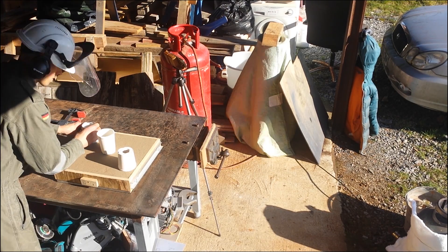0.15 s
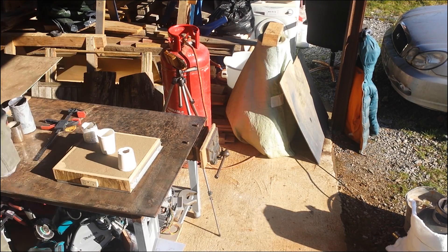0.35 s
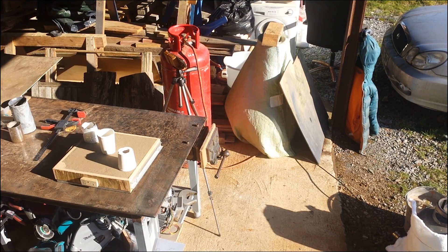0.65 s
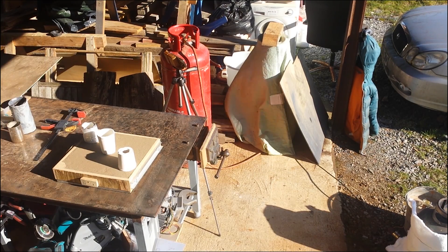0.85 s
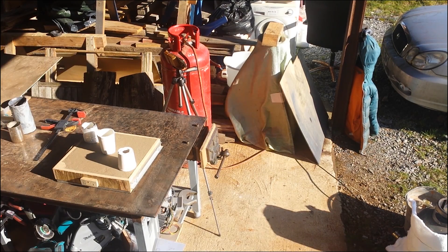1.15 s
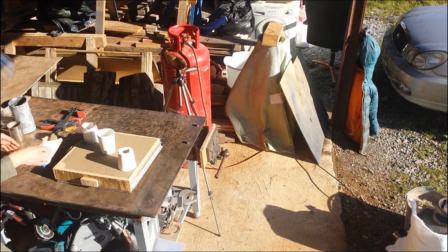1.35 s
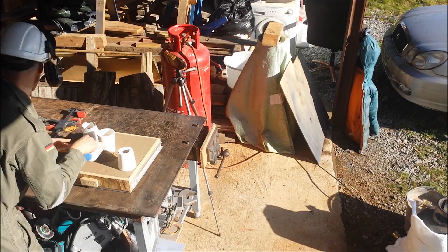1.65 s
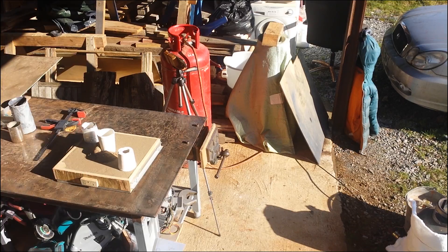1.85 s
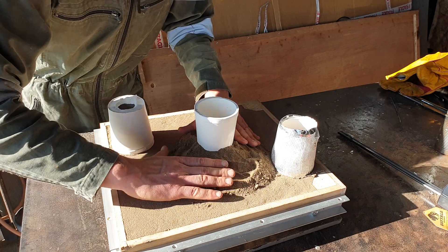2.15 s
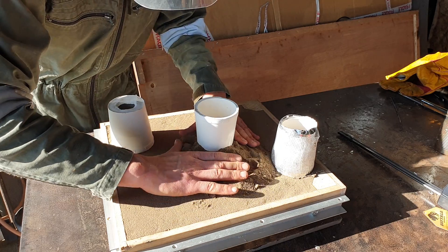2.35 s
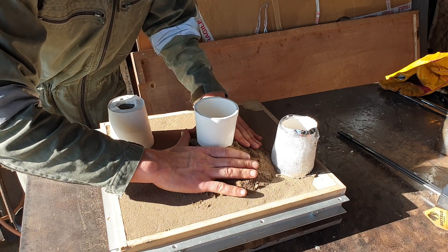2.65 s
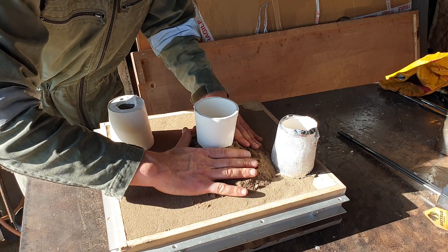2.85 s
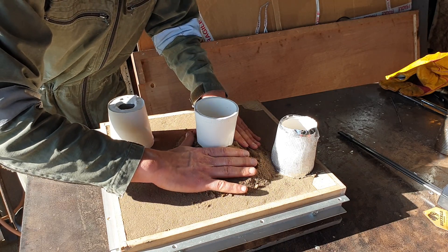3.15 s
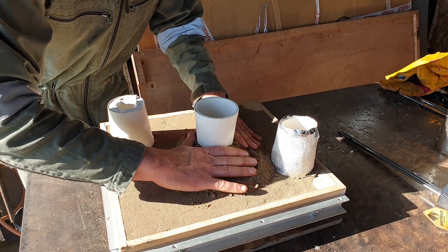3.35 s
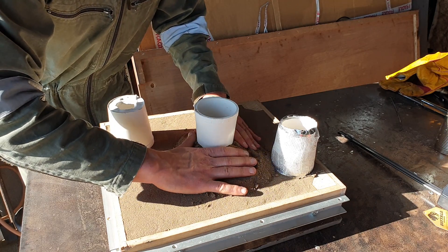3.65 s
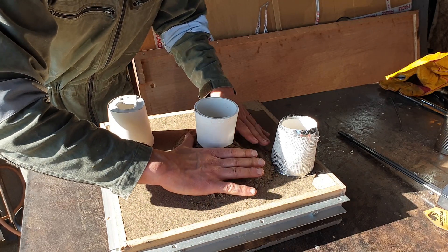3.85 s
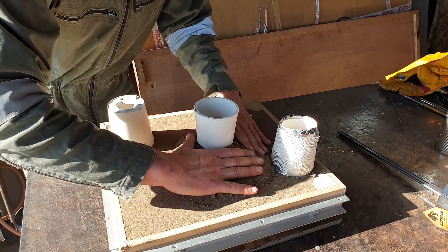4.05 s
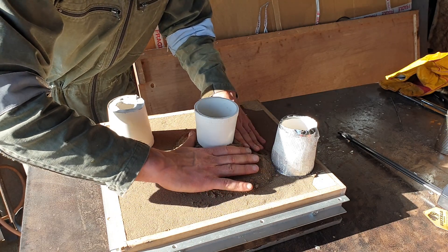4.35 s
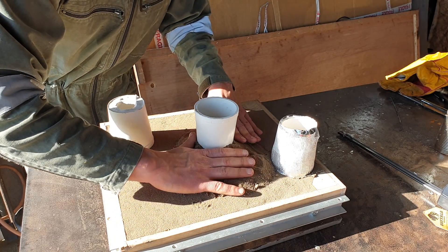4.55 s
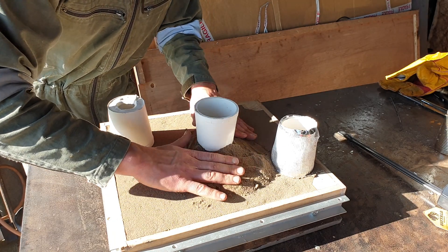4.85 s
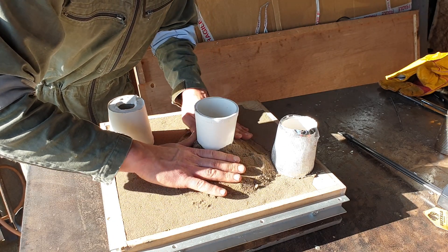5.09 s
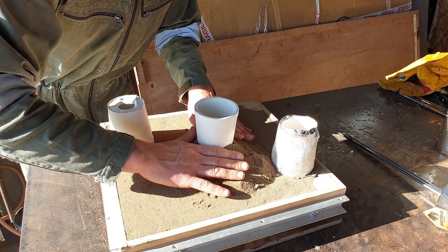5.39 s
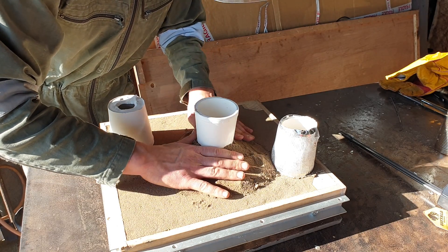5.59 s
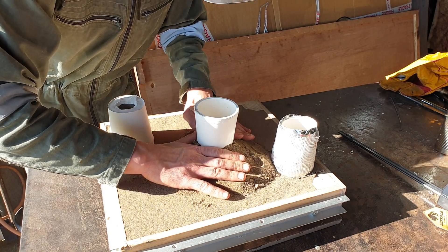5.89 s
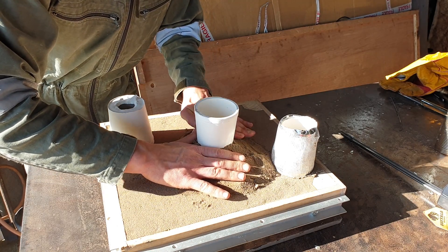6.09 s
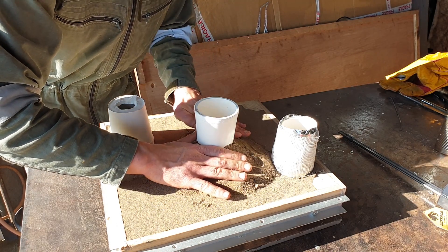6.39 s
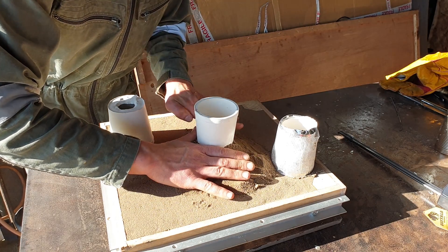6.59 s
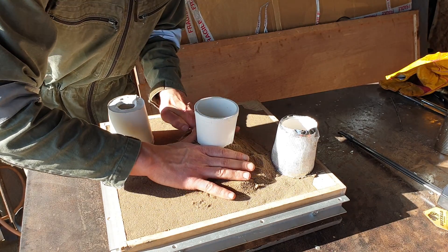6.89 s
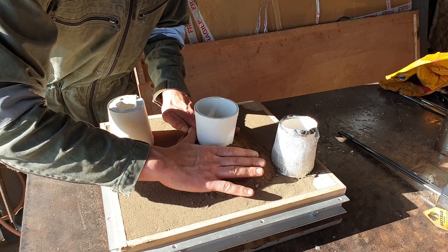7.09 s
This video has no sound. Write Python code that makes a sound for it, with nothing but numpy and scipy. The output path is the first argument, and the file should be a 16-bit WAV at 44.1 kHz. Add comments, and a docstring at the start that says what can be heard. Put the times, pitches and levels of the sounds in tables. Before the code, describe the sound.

A faint hollow drone with light scuffs and thumps at a workbench cuts abruptly to a close, steady gas burner roar with wavering hiss.

```python
"""A gas burner fires into a small furnace in a backyard workshop while a sand mould is packed by hand.
At first resonances and a repeating delay make filtered noise a faint, hollow, humming drone, with a thin
sputtering hiss on the right; gritty noise bursts and dull damped sines are light scuffs and thumps at the bench.
Then, all at once, chamber-coloured noise roars close and steady, with a tube's rush and airy note,
and a gas hiss, made of wavering noise bands, holds level and then swells and sinks on the left."""
import sys
import numpy as np
from scipy import signal
from scipy.fft import rfft, irfft, next_fast_len
from scipy.io import wavfile
from scipy.ndimage import uniform_filter1d

SR = 44100
rng = np.random.default_rng(int(sys.argv[2]) if len(sys.argv) > 2 else 0)


def file_out(sig):
    """Save sig as 16-bit WAV at sys.argv[1]."""
    # one column per channel
    cols = np.atleast_2d(sig).T
    # limit, then scale
    lim = np.clip(cols, -1, 1)
    pcm = np.round(lim * 32767).astype(np.int16)
    wavfile.write(sys.argv[1], SR, pcm)


N = 318843

# Spectra of the faint drone, its thin hiss and the sizzle on top: (frequency [Hz], relative density [dB per Hz])
DRONE_SPECTRUM = [(15, -3), (50, -10), (90, -4), (175, -2), (310, -4), (420, -11), (600, -18), (820, -23),
                  (1020, -36), (1330, -40.5), (1700, -35), (2150, -36.5), (2600, -45.5), (5000, -50.5),
                  (16000, -53)]
THIN_HISS_SPECTRUM = [(1000, -32), (2000, -19.5), (2600, -17), (4000, -16.5), (5600, -16.5), (6500, -7),
                      (7250, 1.5), (7700, -5.5), (8300, -12), (10000, -34), (16000, -36)]
SIZZLE_SPECTRUM = [(6000, -27), (7800, -8), (9400, 0), (10100, -4.5), (11100, -15), (12100, -10.5),
                   (13600, -18), (16000, -21)]
# Resonances that hum in the faint drone: (frequency [Hz], width [Hz], lift [dB])
DRONE_RESONANCES = [(92, 16, 2), (161, 7.2, 4), (183, 9.6, 2), (229, 15, 4), (307, 9, 2), (1546, 180, 8.5)]
# Nearly steady tones in the faint drone: (frequency [Hz], mean level [dB])
HUM_TONES = [(164, -48), (187, -50)]
# Soft thumps on the bench: (time [s], level before the soft onset [dB], pitch [Hz], decay by 60 dB [s])
THUMPS = [(.482, -24, 70, .045), (0.538, -25, 130, 0.047)]
# Hands scuffing on the mould: (time [s], level before onset and grit [dB], fade length [s])
SCUFFS = [(0.48, -51, .012), (0.509, -49.5, 0.011), (0.529, -53, 0.011), (0.547, -55, .01),
          (0.763, -54, 0.0073), (0.789, -57.5, 0.023), (1.093, -52, 0.013), (1.119, -57, .01),
          (1.772, -49.5, 0.011), (1.796, -50, 0.015), (1.821, -54.5, 0.013)]
# Spectrum of a scuff: (frequency [Hz], relative density [dB per Hz])
SCUFF_SPECTRUM = [(300, 5.5), (900, 7), (2000, -2.5), (4000, -1.5), (7000, -3), (10000, -13), (16000, -17)]
# Spectra of the combustion roar and the deep rumble under it: (frequency [Hz], relative density [dB per Hz])
ROAR_SPECTRUM = [(60, -30), (90, -9.5), (115, -2.5), (160, -3.5), (250, -11), (310, -13.5), (420, -17.5),
                 (520, -22.5), (700, -29), (860, -31), (1000, -42.5), (1300, -48.5), (3000, -57)]
RUMBLE_SPECTRUM = [(12, -20), (20, -33), (35, -17.5), (55, 0), (85, 2), (105, 3), (140, -27), (300, -52.5)]
# Resonances and dips of the furnace chamber: (frequency [Hz], width [Hz], lift [dB])
CHAMBER_RESONANCES = [(134.4, 4.2, 4.5), (176, 22.6, 5.5), (191.6, 6.6, -7.5), (219.4, 49, 4),
                      (277.6, 9.5, 7), (323.6, 10.4, 7), (351, 10, -6.5), (372.4, 8.8, 6), (414, 12.4, 5.5),
                      (450, 12, 5), (620, 6.9, 4.5), (735.3, 11, 9)]
# Spectrum of the turbulent rush in the burner tube: (frequency [Hz], relative density [dB per Hz])
RUSH_SPECTRUM = [(500, 4.5), (900, 2.5), (1250, -4), (1800, 2.5), (2500, -3.5), (3200, -7), (4200, -3),
                 (6200, -11), (7500, -8), (8800, -17), (10000, -22), (11600, -8), (13500, -46),
                 (16000, -37)]
# Resonances of the burner tube: (frequency [Hz], width [Hz], lift [dB])
TUBE_RESONANCES = [(1546, 120, 13), (1750, 67, 3), (2186, 140, 5), (2804, 140, 6), (3610, 460, 5),
                   (5500, 340, 6)]
# Spectrum of the gas jet's hiss: (frequency [Hz], relative density [dB per Hz])
JET_SPECTRUM = [(2500, -36), (5000, -21), (6300, -10), (6850, -5), (7150, 0.5), (7550, 2), (7900, -4.5),
                (8300, -9), (9300, -9), (10300, -4.5), (12100, -4), (13000, -2.5), (13500, -5.5),
                (16000, -11)]
# Correlation of roar and rush at the two ears, clipped to -1..1 in use: (frequency [Hz], likeness [ratio])
EAR_LIKENESS = [(40, 4), (130, 1.05), (300, 0.85), (550, 0), (800, 1.7), (1150, 0.5), (1600, 0.89),
                (3000, 0.5), (6000, 0.62), (15000, -2)]
# Excess of the left ear over the right for roar and rush: (frequency [Hz], level difference [dB])
LEFT_EXCESS = [(60, 1), (130, 2.5), (210, 1.5), (400, 3), (800, 3.5), (1500, 2.5), (2700, .5), (15000, 1)]
# Brief flares of the flame: (time [s], lift [dB])
FLARES = [(2.46, 2), (2.77, 4), (4.06, 3.5)]
# Deep rumble under the roar: (time [s], level [dB])
RUMBLE_LEVEL = [(2.15, -34), (2.3, -33), (2.45, -36.5), (2.7, -31), (3.3, -35), (3.8, -31), (4.2, -35),
                (4.9, -31), (5.3, -34), (7.22, -32.5)]
# Rush of air and gas through the tube, before its flicker: (time [s], level [dB])
RUSH_LEVEL = [(2.2, -48), (2.55, -49.5), (2.95, -51), (3.15, -50), (4.1, -50.5), (4.55, -52), (5.0, -53),
              (5.24, -50.3), (5.5, -52), (6.05, -50.5), (6.6, -49.5), (7.22, -50)]
# Gas jet, before its flicker; steady, then swelling and sinking: (time [s], level [dB])
JET_LEVEL = [(2.15, -51.7), (3.87, -52), (3.97, -46.5), (4.13, -55), (4.43, -58.5), (4.52, -51.5),
             (4.62, -60), (4.85, -58), (5.12, -50.5), (5.32, -52), (5.48, -57), (5.62, -53), (5.87, -58.5),
             (6.11, -48), (6.2, -52), (6.35, -52), (6.57, -56.5), (6.8, -50), (7.22, -51.5)]

CLOSE_FROM_S = 2.1412  # middle of the change from faint to close
RIGHT_LAG_S, WALL_ECHO_S, FLUTTER_S = .00034, .0297, .04269
CUTOFF_HZ = 15750
DRONE_DB, THIN_HISS_DB, SIZZLE_DB = -40.5, -58.5, -64  # before flicker and sputter
HUM_WIDTH_HZ = 2.0  # offset at which the gain has halved
SINGING_HZ, SINGING_WIDTH_HZ = 789, 13  # width: offset at which the gain has halved
SINGING_DB, SINGING_FOLLOWS = -53, 0.97  # level at mean rush; share of the rush's swing in dB
ROAR_DB, ROAR_SAG_DB_PER_S = -25.5, 0.16  # level at CLOSE_FROM_S, before flares and flicker
FLARE_S = 0.021  # standard deviation of a flare's bell shape

TIME = np.arange(N) / SR
SIZE = next_fast_len(N, True)
HZ = np.maximum(np.fft.rfftfreq(SIZE, 1 / SR), 1)


def from_db(db):
    """An amplitude ratio grows tenfold for every 20 dB."""
    return 10 ** (np.asarray(db) / 20)


def rms_one(x):
    """Normalise power: the mean of the channels gets rms 1."""
    return x / np.sqrt(np.mean(np.atleast_2d(x).mean(axis=0) ** 2) + 1e-20)


def by_time(points):
    """Interpolate a level linearly over time."""
    seconds, level = np.transpose(points)
    return np.interp(TIME, seconds, level)


def by_hz(points):
    """Interpolate a value over the logarithm of frequency."""
    hz, value = np.transpose(points)
    return np.interp(np.log(HZ), np.log(hz), value)


def colour(spectrum, resonances=()):
    """Resonances add humps or dips, in dB, to a broad source spectrum."""
    gain_db = by_hz(spectrum)
    for hz, width, lift_db in resonances:
        gain_db = gain_db + lift_db / (1 + (2 * (HZ - hz) / width) ** 2)
    return from_db(gain_db)


def delay(seconds):
    """A pure delay turns phase in proportion to frequency."""
    return np.exp(-2j * np.pi * HZ * seconds)


def drift(rate_hz):
    """Low-passed white noise gives a slow random fluctuation of rms 1."""
    spectrum = rfft(rng.standard_normal(SIZE)) / (1 + (HZ / rate_hz) ** 2)
    return rms_one(irfft(spectrum, SIZE)[:N])


def pan(left_db):
    """A level difference between the ears, split evenly, shifts a source sideways."""
    return from_db(np.array([[.5], [-.5]]) * left_db)


def stereo_noise(gain, likeness, left_db):
    """Common and opposed noise set the correlation of the ears; the right ear lags."""
    mid, side = rfft(rng.standard_normal((2, SIZE)))
    alike = np.clip(likeness, -1, 1)
    common = np.sqrt(1 + alike) * mid
    opposed = np.sqrt(1 - alike) * side * [[1], [-1]]
    ears = (common + opposed) * gain * pan(left_db)
    ears[1] *= delay(RIGHT_LAG_S)
    return rms_one(irfft(ears, SIZE)[:, :N])


def steady(x, span_s):
    """Division by the running rms removes slow swells and keeps fast fluctuation."""
    size = max(int(span_s * SR), 2)
    power = uniform_filter1d(x.mean(axis=0) ** 2, size)
    return x / np.sqrt(uniform_filter1d(power, size) + 1e-12)


def moving_reflection(x, lag_s, sway, reflect):
    """A reflection of drifting delay interferes, so ripples wander through the spectrum."""
    at = np.arange(N)
    ears = []
    for ear in x:
        lag = SR * lag_s * (1 + sway * drift(0.24))
        ears.append(ear + reflect * np.interp(at - lag, at, ear))
    return np.array(ears)


def faint_furnace(drone_repeat=0.53, hiss_repeat=0.28, flicker_db=1.0, sputter_rate=14,
                  hiss_sputter_db=.7, sizzle_sputter_db=1.9):
    """Delayed feedback combs a wide drone hollow; hiss and sizzle on the right share one fluctuation."""
    hollow = 1 / (1 - drone_repeat * delay(FLUTTER_S))
    flutter = 1 / (1 - hiss_repeat * delay(FLUTTER_S))
    sputter = drift(sputter_rate)
    drone = stereo_noise(colour(DRONE_SPECTRUM, DRONE_RESONANCES) * hollow, likeness=0.062, left_db=-2.1)
    drone = steady(drone, span_s=0.14) * from_db(DRONE_DB)
    hiss = stereo_noise(colour(THIN_HISS_SPECTRUM) * flutter, likeness=0, left_db=-37.0)
    hiss = hiss * from_db(THIN_HISS_DB + hiss_sputter_db * sputter)
    sizzle = stereo_noise(colour(SIZZLE_SPECTRUM) * flutter, likeness=0, left_db=-31.0)
    sizzle = sizzle * from_db(SIZZLE_DB + sizzle_sputter_db * sputter)
    return drone + (hiss + sizzle) * from_db(flicker_db * drift(32))


def faint_hum(waver_db=1.0):
    """Narrow resonances select nearly steady tones from noise."""
    hum = 0
    for hz, db in HUM_TONES:
        resonance = 1 / (1 + ((HZ - hz) / HUM_WIDTH_HZ) ** 2)
        tone = stereo_noise(resonance, likeness=0.47, left_db=-2.0)
        hum += steady(tone, span_s=0.27) * from_db(db + waver_db * drift(3.2))
    return hum


def thumps(rise_s=0.0022):
    """A hand's impulse sets the bench into a few damped, dull oscillations."""
    out = np.zeros(N)
    for s, db, hz, t60 in THUMPS:
        age = np.maximum(TIME - s, 0)
        decay = from_db(db - 60 * np.minimum(age / t60, 2))
        onset = 1 - np.exp(-age / rise_s)
        out += decay * onset * np.sin(2 * np.pi * hz * age)
    return out * pan(-2.5)


def scuffs(attack_s=0.0043, grit_db=3.5):
    """Friction of sand and card excites short noise bursts, roughened by rapid level fluctuation."""
    touch = np.zeros(N)
    for s, db, length in SCUFFS:
        age = np.maximum(TIME - s, 0)
        onset = 1 - np.exp(-age / attack_s)
        touch += from_db(db) * onset * np.exp(-(age / length) ** 2 / 2)
    rub = stereo_noise(colour(SCUFF_SPECTRUM), likeness=0, left_db=-12.0)
    return rub * touch * from_db(grit_db * drift(400))


def singing_tube():
    """Turbulence sustains one narrow resonance as an airy note that strengthens with the rush."""
    rush_db = by_time(RUSH_LEVEL)
    swing_db = rush_db - rush_db[TIME > CLOSE_FROM_S].mean()
    detune = (HZ - SINGING_HZ) / SINGING_WIDTH_HZ
    note = stereo_noise(1 / (1 + detune ** 2), likeness=0.83, left_db=0.0)
    return steady(note, span_s=0.33) * from_db(SINGING_DB + SINGING_FOLLOWS * swing_db)


def gas_jet(flicker_db=.5, patchy_db=1.5):
    """Jet eddies radiate hiss to the left; each half-octave band fluctuates independently."""
    tone = colour(JET_SPECTRUM)
    hiss = 0
    for centre in 2500 * 2 ** (np.arange(7) / 2):
        # overlapping triangles in power on an octave scale
        window = np.sqrt(np.maximum(1 - 2 * np.abs(np.log2(HZ / centre)), 0))
        band = window * tone
        noise = stereo_noise(band, likeness=0.36, left_db=21.0)
        # the norm restores each band's share of the spectrum
        hiss += noise * np.linalg.norm(band) * from_db(patchy_db * drift(9.9))
    hiss = rms_one(moving_reflection(hiss, lag_s=.0035, sway=0.0254, reflect=0.32))
    return hiss * from_db(by_time(JET_LEVEL) + flicker_db * drift(30))


def flame_db():
    """Flame strength is a slowly sagging level plus brief bell-shaped flares."""
    flares = sum(db * np.exp(-((TIME - s) / FLARE_S) ** 2 / 2) for s, db in FLARES)
    return ROAR_DB - ROAR_SAG_DB_PER_S * (TIME - CLOSE_FROM_S) + flares


def burner(echo=0.22, flicker_db=-0.07, rush_flicker_db=.5, bright_hz=4300, follow=.36):
    """Combustion noise excites the chamber and flow noise the tube; one turbulence modulates roar and rush."""
    wall = 1 + echo * delay(WALL_ECHO_S)
    likeness, left_db = by_hz(EAR_LIKENESS), by_hz(LEFT_EXCESS)
    turbulence = drift(46)

    roar = stereo_noise(colour(ROAR_SPECTRUM, CHAMBER_RESONANCES) * wall, likeness, left_db)
    roar = steady(roar, span_s=0.1) * from_db(flame_db() + flicker_db * turbulence)
    rumble = stereo_noise(colour(RUMBLE_SPECTRUM), likeness=0.92, left_db=3.5)
    rumble = steady(rumble, span_s=.15) * from_db(by_time(RUMBLE_LEVEL))

    rush = stereo_noise(colour(RUSH_SPECTRUM, TUBE_RESONANCES) * wall, likeness, left_db)
    rush = rms_one(moving_reflection(rush, lag_s=.006, sway=0.042, reflect=0.29))
    # the top of the rush swells and sinks with the gas jet
    top = irfft(rfft(rush, SIZE) / (1 + (bright_hz / HZ) ** 6), SIZE)[:, :N]
    jet_db = by_time(JET_LEVEL)
    rush = rush + top * (from_db(follow * (jet_db - jet_db.mean())) - 1)
    rush = rush * from_db(by_time(RUSH_LEVEL) + rush_flicker_db * turbulence)
    return roar + rumble + rush


def scene():
    """Superpose the sources; the faint group crossfades to the close group within two milliseconds."""
    close = np.clip((TIME - CLOSE_FROM_S) / .002 + .5, 0, 1)
    faint_group = faint_furnace() + faint_hum() + thumps() + scuffs()
    close_group = singing_tube() + gas_jet() + burner()
    return (1 - close) * faint_group + close * close_group


def record(dry):
    """A steep elliptic low-pass removes the top of the spectrum."""
    low_pass = signal.ellip(14, .1, 80, CUTOFF_HZ, fs=SR, output="sos")
    return signal.sosfilt(low_pass, dry)


dry = scene()
out = record(dry)
file_out(out)
```